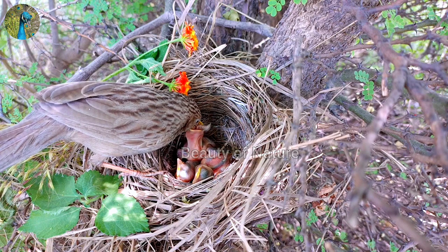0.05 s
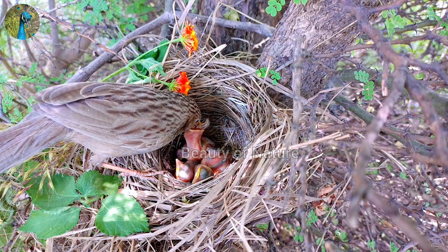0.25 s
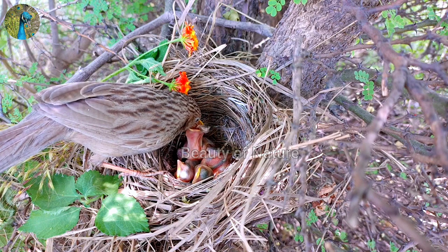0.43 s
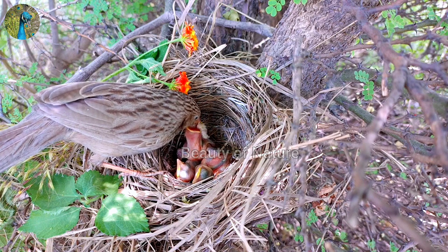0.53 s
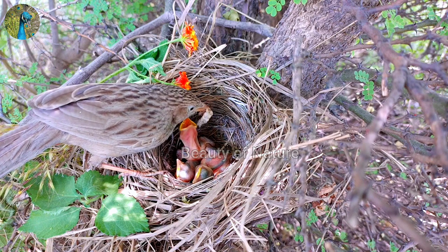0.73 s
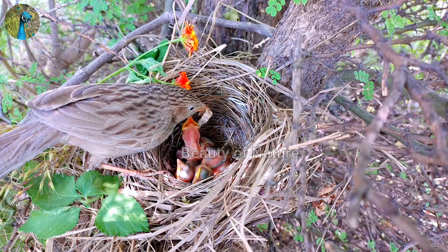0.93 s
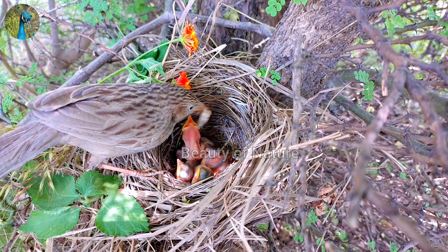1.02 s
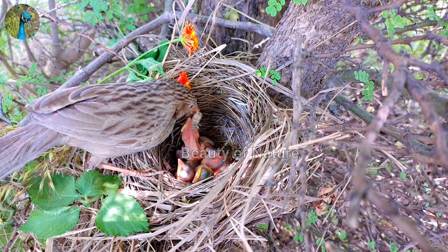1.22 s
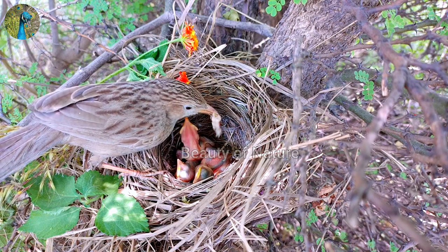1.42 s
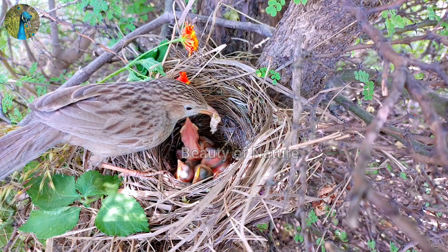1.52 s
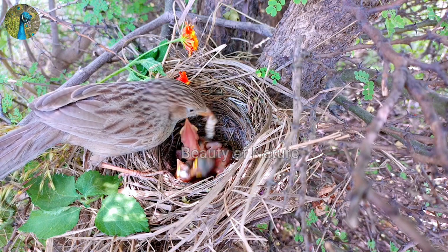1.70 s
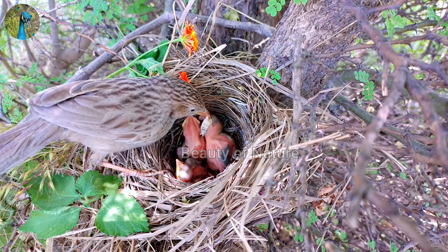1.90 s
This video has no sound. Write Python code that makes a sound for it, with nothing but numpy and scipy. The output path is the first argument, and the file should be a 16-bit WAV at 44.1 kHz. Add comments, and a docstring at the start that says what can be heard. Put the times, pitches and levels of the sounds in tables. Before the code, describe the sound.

Close birdsong in a thicket: quiet trills and pips lead to a louder hard rattle midway, then sharp chirps and a softer ending. Thin nestling whistles sit beneath; the faint background dips between calls, as with noise reduction.

```python
"""A small bird warbles close by: short tones, sliding pips, a clicking rattle, buzzes and burry trills.
Nestlings add thin whistles with a faint octave and cheeps made of rapid pulses.
Fading noise gives the birds short echoes, as from branches in a thicket.
Patchy shaped noise makes leaves rustle faintly; low sine waves make the hum of a far engine.
A noise suppressor turns bass and treble down while the birds are quiet."""
import sys
import numpy as np
from scipy import signal
from scipy.io import wavfile
from scipy.ndimage import uniform_filter1d

SR = 44100
rng = np.random.default_rng(int(sys.argv[2]) if len(sys.argv) > 2 else 0)


def log_audio(samples):
    """Write samples as a 16-bit WAV file to the path given in sys.argv[1]."""
    # one column per channel
    frames = np.atleast_2d(samples).T
    # limit to full scale, then quantise
    limited = np.clip(frames, -1, 1)
    pcm = np.round(limited * 32767).astype(np.int16)
    wavfile.write(sys.argv[1], SR, pcm)


N = 85995

# Bird levels below are set before the echoes and the suppressor.
# Warbler's held notes: (start [s], length [ms], level [dB], start pitch [Hz], middle pitch [Hz], end pitch [Hz])
HELD_NOTES = [(0.0841, 13.5, -53, 3250, 3410, 3960), (0.099, 18, -58, 3660, 3960, 4280),
              (0.3534, 37.2, -47.5, 3295, 3387, 3506), (0.7532, 21, -49.5, 2450, 2457, 3060),
              (1.177, 14.5, -39.5, 2835, 3247, 3650), (1.1962, 14.8, -36.5, 3300, 2814, 3920),
              (1.3615, 22.3, -46.5, 3439, 3433, 3560), (1.582, 13.2, -48.5, 2416, 2660, 2950),
              (1.626, 20.6, -40, 2600, 3042, 2700), (1.6534, 18.7, -37, 2910, 2866, 2680),
              (1.6744, 14.7, -37.5, 3077, 2830, 2650)]
# Warbler's hooked notes, a click and then a dip in pitch:
# (start [s], length [ms], level [dB], middle pitch [Hz])
HOOKED_NOTES = [(0.6283, 15.5, -40, 2867), (0.6496, 9.8, -42, 2713), (0.6696, 13.8, -40, 2960),
                (0.693, 9.9, -37.5, 2766), (1.5996, 7.7, -40.5, 2670)]
# Warbler's short falling pips: (centre [s], length [ms], level [dB], middle pitch [Hz])
FALLING_PIPS = [(0.064, 40, -52, 3907), (1.2247, 14, -41, 2812), (.122, 21, -51, 3510),
                (.434, 22, -44, 2870), (.455, 15.7, -44.5, 2740), (.719, 15, -49.5, 2470),
                (.737, 10, -51, 2126), (.787, 9.8, -45, 2476), (1.159, 15, -38, 3347),
                (0.479, 14, -58, 2410), (.496, 14, -56, 2290), (.523, 11, -52, 2120),
                (0.536, 16, -50.5, 2024), (1.1421,7.3,-35.5,3055), (1.1675,1.92,-39,3200),
                (1.1739,2.93,-32.5,3020), (1.616, 5, -49, 3560), (1.648,2.9,-33.5,3110),
                (1.6744,3,-33.5,3450)]
# Beats of the warbler's rattle, three clicks each: (centre of first click [s])
RATTLE_BEATS = [.852, 0.8662, 0.8857, 0.9055, 0.9281, 0.9479, 0.969, 0.9889, 1.008]
# Warbler's fast, fairly even buzzes:
# (start [s], length [ms], level reached at the end [dB], start pitch [Hz], end pitch [Hz])
FAST_BUZZES = [(0.389, 31.4, -39.5, 3280, 3020), (.606, 15, -39, 3180, 3250),
               (1.085, 54, -33.5, 3560, 3250)]
# Warbler's burry trills: (start [s], length [ms], level [dB], start pitch [Hz], end pitch [Hz])
BURRY_TRILLS = [(0.121, 22, -57.5, 3266, 2700), (.172, 138, -44, 4138, 4492), (.238, 110, -40, 4167, 3673),
                (0.701, 45.6, -49.5, 3200, 2957), (1.305, 89, -47.5, 3344, 3493),
                (1.429, 37, -56, 2025, 2414), (1.464, 64.8, -44.5, 2550, 2464),
                (1.686, 46, -50, 2764, 2280)]
# Nestlings' thin whistles: (start [s], length [ms], start pitch [Hz], end pitch [Hz])
THIN_WHISTLES = [(0.322, 104, 4500, 4150), (.51, 62, 4250, 4500), (0.548, 120, 3300, 4340),
                 (.578, 95, 4550, 4950), (.985, 75, 4700, 4700), (1.672, 90, 4350, 5050),
                 (1.7, 85, 3850, 3850)]
# Fluttering calls of rapid pulses: mostly the nestlings' cheeps, but the rows at 1.426 s and 1.467 s are the
# warbler's own rough trill, an upper voice over its lower trill: # (start [s], length [ms], level [dB], start
# pitch [Hz], middle pitch [Hz], end pitch [Hz])
FLUTTER_CHEEPS = [(0.028, 37, -60, 4130, 4980, 4440), (0.273, 55, -68, 4430, 5830, 7100),
                  (0.686, 18.5, -53, 3700, 4190, 3730), (1.246, 39, -61.5, 5300, 5310, 7100),
                  (1.278, 40, -57.5, 3680, 4550, 5680), (1.426, 50, -54.5, 3450, 4930, 3820),
                  (1.467, 44, -45.5, 3150, 4006, 3210), (1.624, 61, -66, 6040, 5870, 5370),
                  (1.829, 54, -64.5, 4750, 4830, 5160), (1.884, 40, -64.5, 5930, 5780, 6080)]
# Tone colour of the rustling leaves: (frequency [Hz], relative level [dB])
RUSTLE_COLOUR = [(150, -1.5), (1800, -9.5), (4000, -22), (9500, -22.5), (15000, -38)]
# Engine hum, one row for each multiple of ENGINE_HZ from the third up: (relative level [dB])
ENGINE_ORDERS = [-12, -1, -11.5, -25, -14.5, -16.5]

ENGINE_HZ = 18.25
RUSTLE_DB, HUM_DB, PATCH_DB = -68, -61.5, 3.5
ECHO_DB, ECHO_T60_S = -9, .12  # T60: time for the echoes to fall by 60 dB
OVERTONE_DB, WHISTLE_OVERTONE_DB = -46, -23  # the octave, relative to the main tone
WHISTLE_DB, WHISTLE_WAVER_DB, WHISTLE_ARCH_HZ = -70.5, 1.5, 416
NOTE_EDGE_MS = 2.03
CLICK_MS = 2.726
# A pip or click starts this far above its middle pitch and ends as far below
PIP_FALL_HZ, CLICK_FALL_HZ = 285, 514
# A hook starts and ends this far above its middle pitch; its click is centred just ahead of the note
HOOK_FROM_HZ, HOOK_TO_HZ, HOOK_LEAD_S = 850, 322, 0.00194
RATTLE_HZ, RATTLE_DB = 3744, -32.5
RATTLE_START_DB, RATTLE_SWELL = -23, 0.4  # first beat is softer; the lack shrinks by this factor each beat
RATTLE_AFTER_S, RATTLE_OUTER_DB = [0, .0042, .0098], -3.5  # the middle click is the loudest
BUZZ_PER_S, BUZZ_START_DB = 260, -13.5
TRILL_PER_S, CHEEP_PER_S = 200, 310  # typical pulse rates
TRILL_JITTER, TRILL_SPREAD_DB = .35, 3.5  # unevenness of pulse timing and of pulse level
TRILL_FALL_HZ, CHEEP_FALL_HZ = 810, 253.5  # size of the slide in each pulse; for trills, at RATTLE_HZ
FALL_LAW = 3.  # higher trills slide further: power of the pitch
SUPPRESS_HZ = [2270, 6820]  # only sound outside this band is turned down
SUPPRESS_SLOPE, SUPPRESS_S = 0.33, 0.065  # dB of cut per dB of drop in bird level; lag
TOP_HZ = 15500


def amp(db):
    """Turn decibels into a plain multiplier."""
    return 10 ** (np.asarray(db) / 20)


def add(mix, start_s, sound):
    """Lay a sound into the mix, cutting off what runs past the end."""
    part = mix[round(start_s * SR):][:len(sound)]
    part += sound[:len(part)]


def span(ms):
    """Count smoothly from 0 to 1 over a length of time."""
    return np.linspace(0, 1, int(ms * SR / 1000) + 2)


def rustle():
    """Leaves: noise with a set tone colour, its loudness varying in patches of time and pitch."""
    colour_hz, colour_db = np.transpose(RUSTLE_COLOUR)
    hz = np.fft.rfftfreq(1024, 1 / SR)
    real, imaginary, patches = rng.standard_normal((N // 256 + 5, 513, 3)).T
    patches = uniform_filter1d(patches, size=6, axis=0)  # smooth along pitch
    patches = uniform_filter1d(patches, size=8, axis=1)  # smooth along time
    patch_share = np.clip(1 - hz / TOP_HZ, 0, 1)[:, None]  # less patchy towards the treble
    level_db = np.interp(np.log(hz + 1), np.log(colour_hz), colour_db)[:, None]
    level_db = level_db + patch_share * PATCH_DB * patches / patches.std()
    spectrum = (real + 1j * imaginary) * amp(level_db)
    leaves = signal.istft(spectrum, nperseg=1024, noverlap=768)[1][:N]
    return leaves / leaves.std() * amp(RUSTLE_DB)


def engine():
    """Far engine: steady sine waves at whole multiples of one slow rate."""
    t = np.arange(N) / SR
    hum = np.zeros(N)
    for k, db in enumerate(ENGINE_ORDERS):
        hum += amp(db) * np.sin(2 * np.pi * ((k + 3) * ENGINE_HZ * t + rng.random()))
    return hum * amp(HUM_DB)


def thicket(birds):
    """Short scattered echoes from branches: the birds smeared by quickly fading noise."""
    t = np.arange(SR // 2) / SR
    tail = rng.standard_normal(len(t)) * amp(-60 * t / ECHO_T60_S)
    echoes = signal.fftconvolve(birds, tail / np.linalg.norm(tail))[:N]
    return birds + amp(ECHO_DB) * echoes


def arch(u, start_hz, middle_hz, end_hz):
    """Pitch curve: a parabola through the start, middle and end pitch."""
    start_part = start_hz * (1 - u) * (1 - 2 * u)
    middle_part = 4 * middle_hz * u * (1 - u)
    end_part = end_hz * u * (2 * u - 1)
    return start_part + middle_part + end_part


def tone(hz, overtone_db):
    """Bird voice: nearly a pure sine wave, with a fainter octave on top."""
    angle = 2 * np.pi * (np.cumsum(hz) / SR + rng.random())
    return np.sin(angle) + amp(overtone_db) * np.sin(2 * angle)


def trill(mix, start_s, ms, db, start_hz, middle_hz, end_hz, rate, fall_hz):
    """Uneven pulses, each with a downward slide, strung along an arched pitch."""
    u = span(ms)
    length_draw, level_draw, slide_draw = rng.standard_normal((100, 3)).T
    ends_s = np.cumsum(np.exp(TRILL_JITTER * length_draw)) / rate
    beat = np.interp(np.arange(len(u)) / SR, np.r_[0, ends_s], np.arange(len(ends_s) + 1))
    k = beat.astype(int) % len(ends_s)  # which pulse
    v = beat % 1  # 0 to 1 within that pulse
    pulses = np.sin(np.pi * v) * amp(TRILL_SPREAD_DB * level_draw[k])
    slide_hz = fall_hz * (1 + np.tanh(slide_draw[k])) * ((1 - v) ** 2 - .25)
    # Longer pulses also sit higher in pitch
    slide_hz += CHEEP_FALL_HZ * TRILL_JITTER * length_draw[k]
    hz = arch(u, start_hz, middle_hz, end_hz) + uniform_filter1d(slide_hz, size=40)
    swell = np.sqrt(np.sin(np.pi * u))
    add(mix, start_s, amp(db) * swell * pulses * tone(hz, OVERTONE_DB))


def whistle(mix, start_s, ms, start_hz, end_hz):
    """A thin tone that arches in pitch, with a randomly wavering level."""
    u = span(ms)
    hz = arch(u, start_hz, (start_hz + end_hz) / 2 + WHISTLE_ARCH_HZ, end_hz)
    waver = uniform_filter1d(rng.standard_normal(len(u)), size=300)
    level = amp(WHISTLE_DB + WHISTLE_WAVER_DB * waver / waver.std())
    swell = np.sqrt(np.sin(np.pi * u))
    add(mix, start_s, level * swell * tone(hz, WHISTLE_OVERTONE_DB))


def nestlings():
    """Young birds: thin arched whistles and cheeps that flutter in rapid pulses; two of the warbler's rough
    trills are played here in the same pulsed way."""
    mix = np.zeros(N)
    for row in THIN_WHISTLES:
        whistle(mix, *row)
    for row in FLUTTER_CHEEPS:
        trill(mix, *row, CHEEP_PER_S, CHEEP_FALL_HZ)
    return mix


def note(mix, start_s, ms, db, *pitches_hz):
    """A held tone with soft edges, a little fuller in the middle."""
    u = span(ms)
    edges = np.sin(np.pi / 2 * np.minimum(np.minimum(u, 1 - u) * ms / NOTE_EDGE_MS, 1)) ** 2
    swell = np.sqrt(.5 + np.sin(np.pi * u) / 2)
    add(mix, start_s, amp(db) * edges * swell * tone(arch(u, *pitches_hz), OVERTONE_DB))


def pip(mix, centre_s, ms, db, hz, fall_hz):
    """A blip that swells and fades like a bell curve while its pitch slides down."""
    u = span(ms)
    bell = np.sin(np.pi * u) ** 2
    voice = tone(hz + fall_hz * (1 - 2 * u), OVERTONE_DB)
    add(mix, centre_s - len(u) / 2 / SR, amp(db) * bell * voice)


def hook(mix, start_s, ms, db, hz):
    """A click leading into a note whose pitch dips and turns up again."""
    pip(mix, start_s - HOOK_LEAD_S, CLICK_MS, db, hz + HOOK_TO_HZ, PIP_FALL_HZ)
    note(mix, start_s, ms, db, hz + HOOK_FROM_HZ, hz, hz + HOOK_TO_HZ)


def rattle(mix):
    """Beats of three falling clicks, growing louder from beat to beat."""
    for beat, start_s in enumerate(RATTLE_BEATS):
        beat_db = RATTLE_DB + RATTLE_START_DB * RATTLE_SWELL ** beat
        for k, after_s in enumerate(RATTLE_AFTER_S):
            click_db = beat_db + RATTLE_OUTER_DB * abs(k - 1)
            pip(mix, start_s + after_s, CLICK_MS, click_db, RATTLE_HZ, CLICK_FALL_HZ)


def buzz(mix, start_s, ms, end_db, start_hz, end_hz):
    """Fast falling clicks that grow louder, with slightly random timing and level."""
    for u in np.arange(0, 1, 1000 / ms / BUZZ_PER_S):
        late, louder_db = rng.standard_normal(2)
        click_s = start_s + u * ms / 1000 + late * TRILL_JITTER ** 2 / BUZZ_PER_S
        click_db = end_db + BUZZ_START_DB * (1 - u) + louder_db
        pip(mix, click_s, CLICK_MS, click_db, start_hz + (end_hz - start_hz) * u, CLICK_FALL_HZ)


def warbler():
    """The near bird: notes, hooks, pips, a rattle, buzzes and trills."""
    mix = np.zeros(N)
    for row in HELD_NOTES:
        note(mix, *row)
    for row in HOOKED_NOTES:
        hook(mix, *row)
    for row in FALLING_PIPS:
        pip(mix, *row, PIP_FALL_HZ)
    rattle(mix)
    for row in FAST_BUZZES:
        buzz(mix, *row)
    for start_s, ms, db, start_hz, end_hz in BURRY_TRILLS:
        middle_hz = (start_hz + end_hz) / 2
        fall_hz = TRILL_FALL_HZ * (middle_hz / RATTLE_HZ) ** FALL_LAW
        trill(mix, start_s, ms, db, start_hz, middle_hz, end_hz, TRILL_PER_S, fall_hz)
    return mix


def scene():
    """Birds echoing in the thicket, over the rustle and the engine."""
    background = rustle() + engine()
    birds = nestlings() + warbler()
    return (thicket(birds) + background)[None]


def record(dry):
    """A noise suppressor turns bass and treble down, with a lag, as the birds grow quiet; then a top limit."""
    outside_filter = signal.firwin(511, SUPPRESS_HZ, fs=SR)[None]
    outside = signal.oaconvolve(dry, outside_filter, "same")
    bird_band = dry - outside
    power = uniform_filter1d(bird_band ** 2, size=900, axis=1)
    level_db = 10 * np.log10(abs(power) + 1e-9)
    keep = np.exp(-1 / (SUPPRESS_S * SR))
    first_db = level_db[0, 0]  # the lag starts settled at the first level
    lagged_db = signal.lfilter([1 - keep], [1, -keep], level_db - first_db) + first_db
    out = bird_band + outside * amp(SUPPRESS_SLOPE * (lagged_db - lagged_db.max()))
    top_filter = signal.firwin(511, TOP_HZ, window=("kaiser", 9), fs=SR)[None]
    return signal.oaconvolve(out, top_filter, "same")


dry = scene()
out = record(dry)
log_audio(out)
```